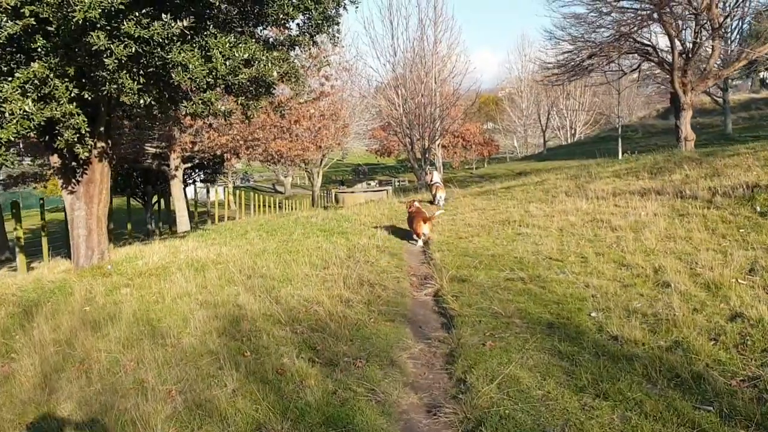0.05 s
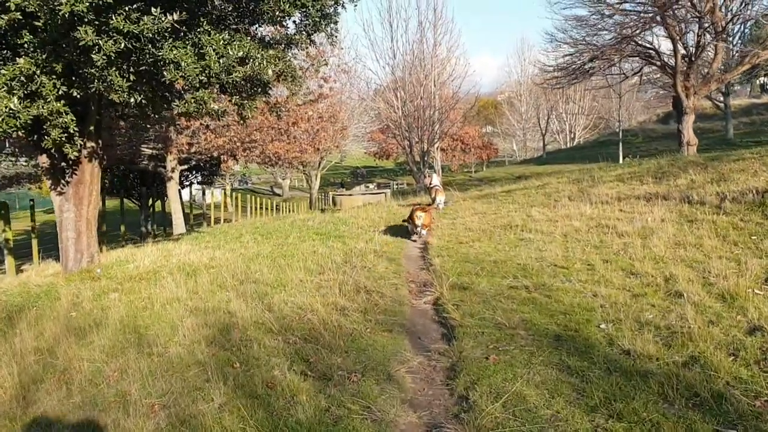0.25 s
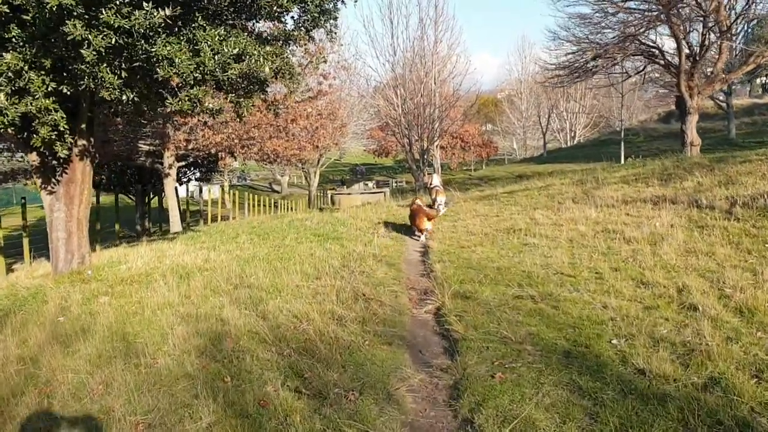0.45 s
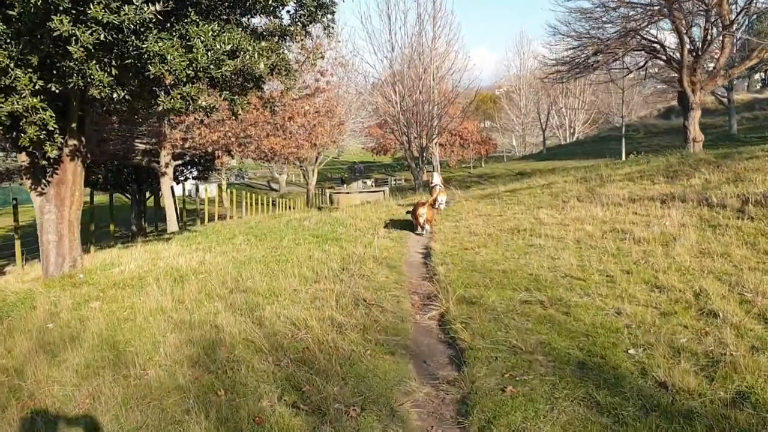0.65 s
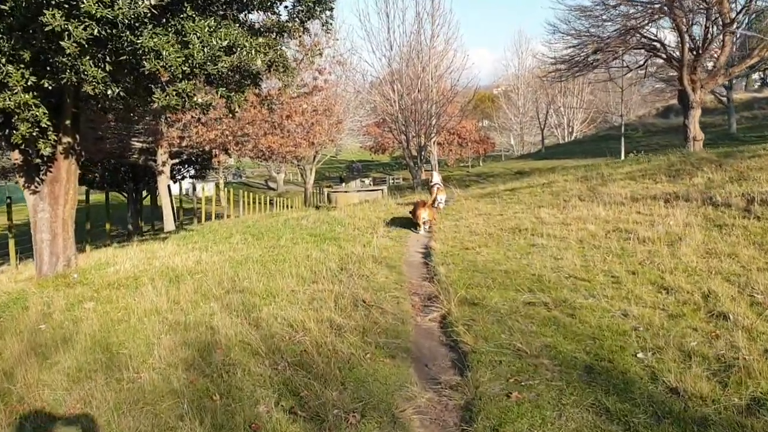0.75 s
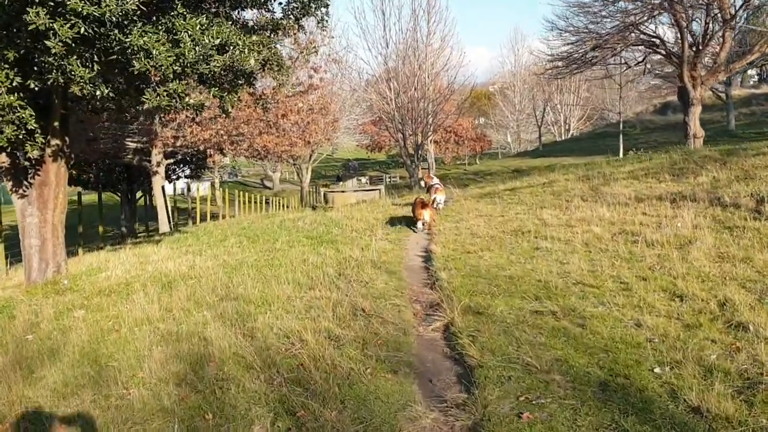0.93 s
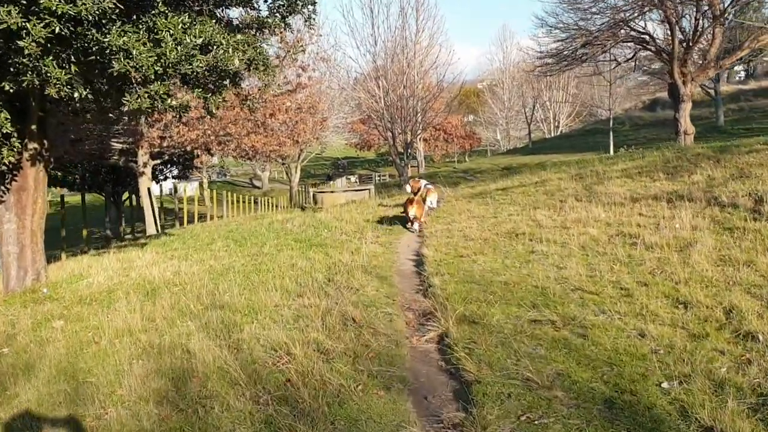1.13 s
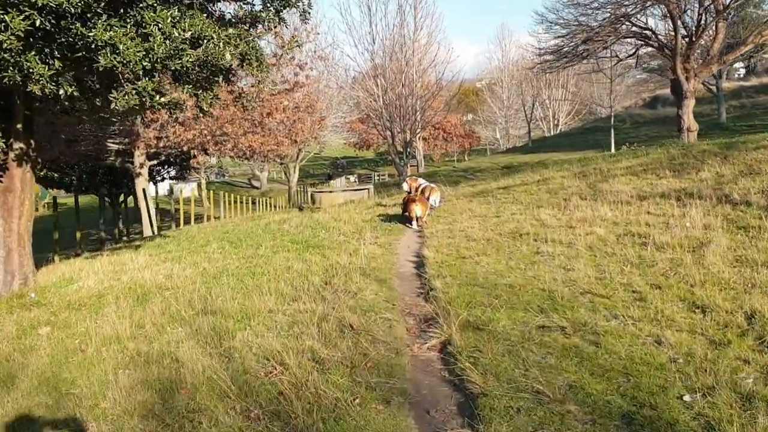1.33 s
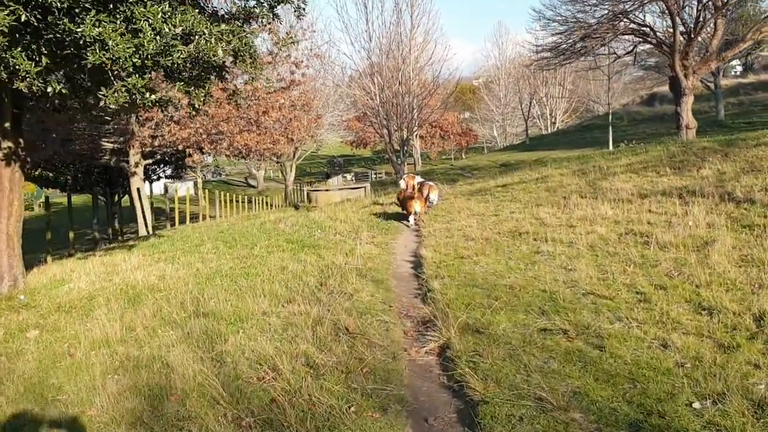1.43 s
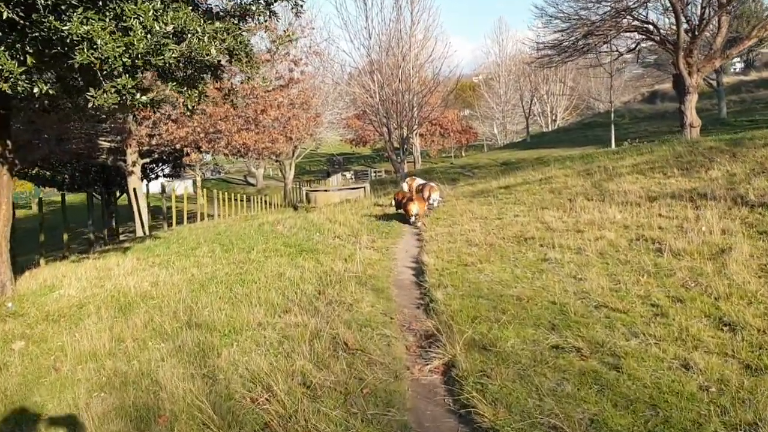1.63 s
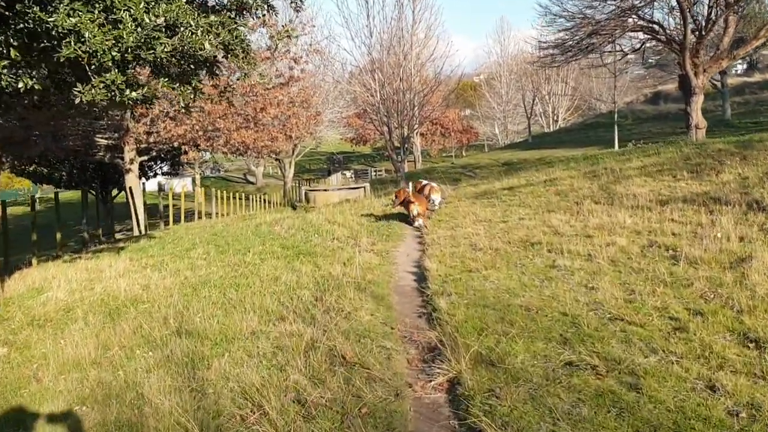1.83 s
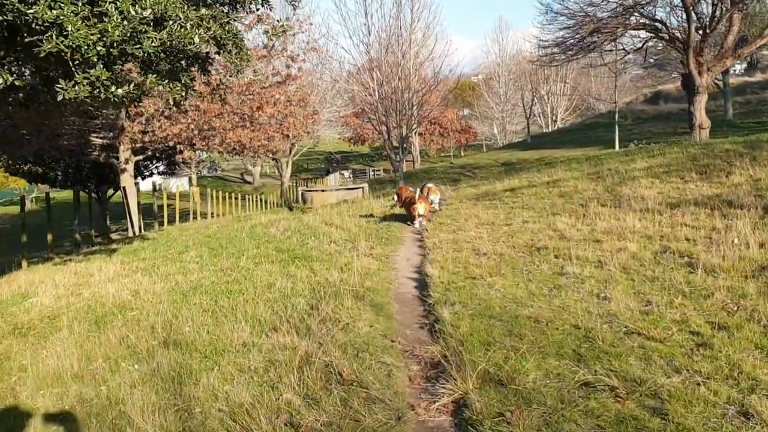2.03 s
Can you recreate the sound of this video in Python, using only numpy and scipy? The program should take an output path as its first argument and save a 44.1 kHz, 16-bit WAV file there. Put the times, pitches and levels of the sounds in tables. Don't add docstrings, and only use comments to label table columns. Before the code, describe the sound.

Low, muffled footfalls on a dirt track jolt a handheld microphone, mostly in the right channel, with small case knocks, grass swishes and crunches, a brief bird whistle then a trill, over distant town hum.

```python
import sys
import numpy as np
from scipy import signal
from scipy.fft import rfft, irfft
from scipy.io import wavfile
from scipy.ndimage import uniform_filter1d, map_coordinates

SR = 44100
rng = np.random.default_rng(int(sys.argv[2]) if len(sys.argv) > 2 else 0)


def transcribe(u):
    v = np.clip(np.atleast_2d(u).T, -1, 1)
    q = np.round(v * 32767).astype(np.int16)
    wavfile.write(sys.argv[1], SR, q)


def linear_from_db(decibels):
    return 10 ** (np.asarray(decibels, float) / 20)


N = 91683
T = np.arange(N) / SR

# f/Hz, level/dB per Hz
HUM_LEFT = [(150, -9), (350, 2), (700, -25), (1200, -29.5), (2400, -15), (4000, -32.5), (8500, -36),
            (12000, -51.5)]
HUM_RIGHT = [(150, 2.5), (350, 4), (600, -2.5), (1000, -9.5), (2000, -16.5), (3800, -21), (4600, -50.5),
             (9000, -51.5)]
# t/s, peak level/dB, f/Hz, length/s
JOLTS_RIGHT = [(.003, -32, 97, 0.0096), (0.02, -45.5, 80, 0.0073), (0.072, -29, 96.4, 0.016),
               (0.103, -16.5, 83.5, 0.0056), (0.127, -25.5, 82.2, 0.02), (0.167, -20, 92.6, 0.0028),
               (0.207, -22.5, 88.6, 0.018), (0.247, -25, 107, 0.0085), (0.283, -27, 87, 0.0027),
               (0.32, -16, 68, 0.0062), (0.353, -21, 70.6, 0.01), (0.38, -38, 75, 0.0033),
               (0.661, -26, 79, 0.0082), (0.699, -17, 74.8, 0.013), (0.723, -26, 79, 0.011),
               (0.762, -24, 77, 0.01), (0.787, -23, 96.7, 0.0078), (0.834, -21.5, 89, 0.0093),
               (0.872, -18, 76, 0.0045), (0.972, -28, 73, 0.033), (1.054, -28, 89, 0.013),
               (1.25, -26.5, 71.5, 0.022), (1.282, -34, 110.6, 0.025), (1.317, -21.5, 81.5, 0.012),
               (1.34, -24.5, 102, 0.017), (1.436, -23.5, 73.3, 0.013), (1.51, -32.5, 66, 0.017),
               (1.533, -31, 105, 0.011), (1.553, -28, 95, 0.0052), (1.615, -28.5, 89, 0.0042),
               (1.698, -28.5, 68.6, 0.0068), (1.77, -28, 57, 0.019), (1.896, -24, 66.5, 0.0094),
               (1.939, -34, 64, 0.016), (1.997, -32, 103, 0.014), (2.018, -19, 67, 0.0075)]
# t/s, peak level/dB, f/Hz, length/s
HEEL = [
    (.677, -14, 68, .014),
]
# t/s, peak level/dB, f/Hz, length/s
JOLTS_LEFT = [
    (.102, -41, 77, 0.01),
    (.676, -29, 74.7, 0.0094),
    (.717, -30, 72, 0.011),
    (.949, -33, 73.4, 0.012),
    (1.885, -30, 69.5, 0.013),
    (1.905, -29, 77.4, 0.019),
    (1.979, -45, 91, 0.013),
    (2.025, -26, 71.5, 0.017),
]
# t/s, peak level/dB, f/Hz, left against right level/dB
KNOCKS = [(0.169, -29, 289, -40), (0.19, -27, 235, -28), (.21, -31.5, 308, -8), (.673, -35.5, 258, -28.5),
          (0.697, -34, 259, -29), (0.783, -36.5, 257, -13.5), (0.849, -26.5, 186, -8.5),
          (0.864, -37.5, 232, -22), (1.272, -34.5, 185, -5.5), (1.287, -31, 205, -16),
          (1.345, -27, 193, -15), (1.358, -36.5, 313, -2.5)]
# t/s, level/dB
SWAY = [(0, -37), (.38, -32.5), (.46, -42.5), (.63, -41.5), (.7, -29.5), (1.05, -45), (1.2, -50),
        (1.3, -32), (1.55, -38.5), (1.85, -50.5), (1.9, -41), (2.08, -36.5)]
# f/Hz, level/dB per Hz
SWAY_TONE = [(15, -22.5), (40, 4), (70, 1.5), (130, -2), (200, -13.5), (400, -36), (700, -39.5),
             (2000, -71)]
# t/s, level/dB, lift of the lower rings/dB
SWISH = [(0, -55.5, -5), (.1, -61, 3.5), (.2, -60.5, 5), (.38, -62.5, 3), (.46, -69, -0.5),
         (.68, -64.5, 5.5), (.88, -57, -3.5), (1.0, -66, 5), (1.11, -68.5, 4), (1.22, -59, -2.5),
         (1.52, -64, 0.5), (1.61, -59.5, 3.5), (1.68, -63, 0), (1.78, -58, -6), (1.82, -71, 2.5),
         (1.9, -68.5, 4.5), (1.99, -58, 3), (2.05, -64, 0.5)]
# t/s, level/dB, time to fall 60 dB/s, brightness/dB
CRUNCH = [(.03, -63, 0.31, 3), (.143, -61, .05, 1.5), (0.201, -67, 1, 4.5), (0.279, -50, 0.038, -4),
          (.39, -69, 0.13, 5.5), (0.425, -63.5, 0.17, 3.5), (.728, -61, 0.063, -2.5),
          (.76, -62.5, 0.16, -12), (0.847, -48.5, 0.08, -14), (.952, -63.5, 0.14, 0.5),
          (1.057, -61.5, 0.056, -1), (1.33, -56.5, 0.13, 8), (1.348, -53, 0.32, 4), (1.427, -54, 0.15, -9)]
# f/Hz, width/Hz, level/dB
CAVITY = [(833, 600, -6.5), (1430, 400, -7), (1800, 316, 4.5), (2210, 820, -7.5), (3544, 496, 0.5)]
# f/Hz, width/Hz, level/dB
UPPER = [(4820, 1100, -13.5), (6470, 810, -21.5), (7000, 880, -20.5), (11400, 2300, -21.5),
         (15300, 2000, -22)]
# f/Hz, width/Hz, level/dB
OPEN = [(985, 1400, -22.5), (1720, 310, -15), (2560, 1300, -36), (4960, 1600, -41), (7700, 2500, -33),
        (12500, 6000, -43.5)]
# t/s, peak level/dB, f/Hz, time to fall 60 dB/s
STALKS = [(.021, -56.5, 5900, 0.01), (0.036, -56, 5200, 0.01), (.231, -47.5, 5340, 0.0049),
          (.232, -59, 3300, 0.0088), (.244, -59, 4900, .012), (.305, -58, 5180, .01),
          (0.728, -67.5, 5160, .005), (.962, -70, 5100, .005), (1.331, -49, 5100, .03),
          (1.331, -63, 7640, .02), (1.332, -59, 11000, .02), (1.338, -66, 15200, .015),
          (1.351, -51, 5140, .025), (1.511, -39, 3450, 0.011), (1.907, -52, 3680, 0.016),
          (2.062, -64, 5100, .02)]
# t/s, length/s, start f/Hz, end f/Hz, level/dB
BIRD = [(.488, .018, 2560, 2540, -59), (1.132, .045, 5600, 4100, -68), (1.148, .043, 4350, 3450, -54),
        (1.455, .027, 7600, 6500, -68), (1.484, .009, 7000, 7800, -70), (1.489, .029, 7800, 6250, -60),
        (1.515, .012, 6600, 7750, -65), (1.526, .023, 7650, 6500, -58), (1.548, .016, 7550, 7800, -62),
        (1.556, .024, 7850, 6500, -59), (1.571, .014, 7950, 7300, -65), (1.578, .01, 6700, 7600, -65),
        (1.587, .012, 7500, 6150, -64), (1.588, .016, 7000, 7650, -63), (1.607, .011, 6950, 7400, -63),
        (1.611, .01, 5900, 7000, -70), (1.617, .011, 6950, 7400, -63), (1.627, .012, 6900, 6150, -67),
        (1.63, .017, 7500, 6750, -68), (1.503, .012, 8250, 8050, -77), (1.524, .024, 8600, 8000, -76),
        (1.553, .02, 8600, 8250, -76), (.03, .038, 3700, 3950, -61), (.635, .04, 2900, 3350, -65),
        (.75, .03, 3350, 3150, -59), (1.316, .012, 2650, 2750, -62)]
# t/s, level/dB, f/Hz, width/Hz, time to fall 60 dB/s
FAR_CALLS = [
    (.389, -76, 7600, 1000, .2),
    (.43, -83, 7250, 450, .5),
    (1.056, -75, 7800, 1800, .07),
    (1.07, -88, 8650, 500, 1.3),
]
# f/Hz, level/dB per Hz
HISS = [(3000, -20), (6000, -10), (8500, -15.5), (10500, -3.5), (13000, 1.5), (16000, -0.5)]

SNAP_S = .001
WANDER_DB = .8


def unit(x):
    return x / np.sqrt(np.mean(x ** 2))


def curve(rows):
    return linear_from_db(np.interp(T, *np.array(rows).T[:2]))


def colour(points):
    hz, db = np.array(points).T
    f = np.maximum(np.fft.rfftfreq(N + 1, 1 / SR), 1)
    gain = linear_from_db(np.interp(np.log(f), np.log(hz), db)) * (f > 10)
    spectrum = rfft(rng.standard_normal(N + 1)) * gain
    return unit(irfft(spectrum, N + 1)[:N])


def walk(rate_hz):
    k = int(SR / rate_hz)
    held = np.repeat(rng.standard_normal(N // k + 1), k)
    return unit(uniform_filter1d(uniform_filter1d(held, k), k)[:N])


def rings(x, peaks, flicker_db=0):
    out = 0
    for k, (hz, width_hz, db) in enumerate(peaks):
        b, a = signal.iirpeak(hz, hz / width_hz / 1.29, fs=SR)
        ringing = signal.lfilter(b, a, signal.lfilter(b, a, x))
        out = out + (-1) ** k * linear_from_db(db + flicker_db * walk(8.1)) * ringing
    return out


def hum():
    right, swell_db = colour(HUM_RIGHT), 1.2 * walk(2.7)
    shared_low = signal.lfilter(*signal.butter(1, 700, fs=SR), right)
    left = colour(HUM_LEFT) + 1.42 * shared_low
    return np.array([left * linear_from_db(-67 + swell_db), right * linear_from_db(-57 + swell_db + 0.13 * walk(16))])


def jolts(rows, stretch):
    out = np.zeros(N)
    for s, db, hz, length in rows:
        u = T - s
        turn = 2 * np.pi * (hz * (u - 5 * u * u) + rng.random())
        swell = np.exp(-.5 * (u / (stretch * length)) ** 2)
        out += linear_from_db(db) * swell * np.cos(turn + 0.26 * np.sin(turn))
    return out


def knocks():
    out = np.zeros((2, N))
    for s, db, hz, left_db in KNOCKS:
        out += np.outer(linear_from_db([left_db, 0]), jolts([(s, db, hz, .0018)], 1))
    return out


def sway():
    left = linear_from_db(-47.5 + 5.2 * walk(7.95)) * colour(SWAY_TONE)
    right = curve(SWAY) * linear_from_db(2.5 * walk(24.96)) * colour(SWAY_TONE)
    return np.array([left, right])


def steps():
    stretch, leak_db = 0.79, -23.5
    right = jolts(JOLTS_RIGHT + HEEL, stretch)
    left = jolts(JOLTS_LEFT, stretch) + linear_from_db(leak_db) * right
    return np.array([left, right]) + knocks() + sway()


def grains():
    grains_per_s, spread_db = 2500, -0.5
    hits = (rng.random(N) < grains_per_s / SR) * linear_from_db(spread_db * rng.exponential(size=N))
    return unit(hits * rng.standard_normal(N) + 0.23 * rng.standard_normal(N))


def shift(x):
    slide = .008 * SR / 40 * walk(7)
    x = map_coordinates(x, [np.arange(N) + slide], mode="mirror")
    edge_hz = 4120
    return signal.sosfilt(signal.cheby1(6, 1, edge_hz, fs=SR, output="sos"), x)


def grass_strength():
    low = curve(SWISH) * linear_from_db(4 + WANDER_DB * walk(30.64))
    high, top = np.zeros(N), np.zeros(N)
    for s, db, t60, bright_db in CRUNCH:
        u = T - s
        env = linear_from_db(db + 6) * np.clip(u / SNAP_S, 0, 1) * linear_from_db(-60 * np.abs(u) / t60)
        low = np.hypot(low, env * np.clip(u / .007, 0, 1))
        high = np.hypot(high, env * linear_from_db(bright_db))
        top = np.hypot(top, env * linear_from_db(2 * bright_db - 9.5))
    high = np.hypot(high, linear_from_db(-10) * low)
    return low, high, top


def grass():
    low, high, top = grass_strength()
    blades, other = grains(), grains()
    lift = linear_from_db(np.interp(T, *np.array(SWISH).T[::2]))
    heavy = (low / np.median(low)) ** 0.43 * lift
    cavity = rings(low * heavy * blades, CAVITY[:4], flicker_db=WANDER_DB)
    cavity = cavity + rings(low * blades, CAVITY[4:], flicker_db=WANDER_DB)
    right = shift(cavity) + rings(high * other, UPPER[:3], flicker_db=2.6) + rings(top * other, UPPER[3:])
    left = rings(low * (0.38 * blades + other), OPEN[:3])
    left = left + rings(high * grains(), OPEN[3:5]) + rings(top * blades, OPEN[5:])
    return linear_from_db(10) * np.array([left, right])


def stalks():
    out = np.zeros(N)
    for s, db, hz, t60 in STALKS:
        u = np.clip(T - s, 0, 1)
        out += linear_from_db(db - 60 * u / t60) * np.minimum(u / .0006, 1) * np.sin(2 * np.pi * hz * u)
    return np.outer(linear_from_db([-11, 0]), out)


def bird():
    out, high = np.zeros(N), np.zeros(N)
    for s, length, from_hz, to_hz, db in BIRD:
        u = np.clip((T - s) / length, 0, 1)
        bend = 1.6 if to_hz > 6000 else .8
        pitch = from_hz + (to_hz - from_hz) * u ** bend
        lateness = 1.6 if to_hz > 3500 or length < .04 else 3
        swell = np.sin(np.pi * u ** lateness) ** .8
        note = linear_from_db(db + .6) * np.sin(2 * np.pi * np.cumsum(pitch) / SR) * swell
        out = out + note
        high = high + note * (linear_from_db(15 * (s - 1.55)) if to_hz > 6000 else .15)
    waver = linear_from_db(3 * walk(230))
    t, leaf_t60 = T[:SR // 2], .28
    wet = []
    for db in (-11, -10):
        fade = linear_from_db(-60 * t / leaf_t60) * np.sqrt(14 / leaf_t60 / SR)
        tail = linear_from_db(db) * rng.standard_normal(len(t)) * fade
        wet.append(signal.fftconvolve(high * waver, tail)[:N])
    return np.array([linear_from_db(-10) * high, out]) * waver + np.array(wet)


def far_calls():
    out = np.zeros((2, N))
    for s, db, hz, width_hz, t60 in FAR_CALLS:
        u = T - s
        env = linear_from_db(db - 60 * np.abs(u) / t60) * np.clip(u / SNAP_S, 0, 1)
        noise = rng.standard_normal((2, N)) * np.sqrt(SR / 2 / width_hz)
        out += rings(env * noise, [(hz, width_hz, 0)])
    return out


def scene():
    return hum() + steps() + grass() + stalks() + bird() + far_calls()


def top_cut(x):
    return signal.sosfilt(signal.butter(12, 15980, fs=SR, output="sos"), x)


def record(dry):
    low_cut_hz = 38
    cut = signal.lfilter(*signal.butter(2, low_cut_hz, "high", fs=SR), dry)
    hiss = linear_from_db(-79.5) * np.array([colour(HISS), colour(HISS)])
    return top_cut(cut + hiss)


dry = scene()
out = record(dry)
transcribe(out)
```